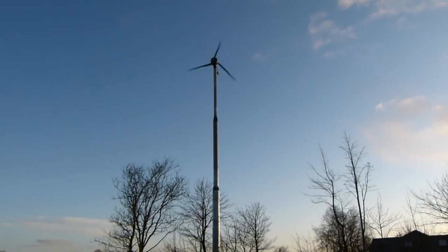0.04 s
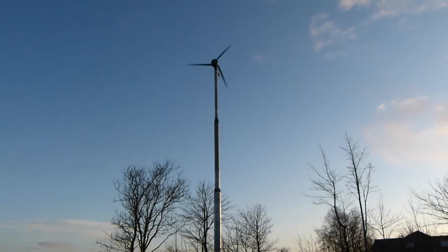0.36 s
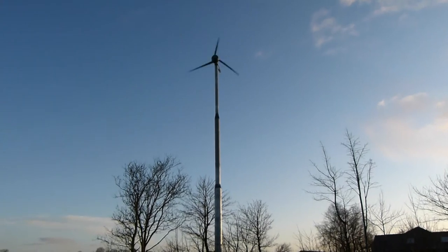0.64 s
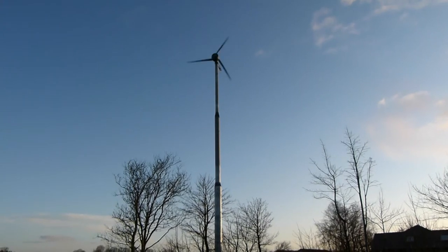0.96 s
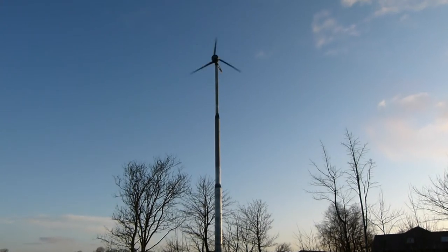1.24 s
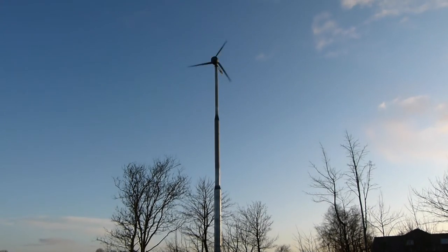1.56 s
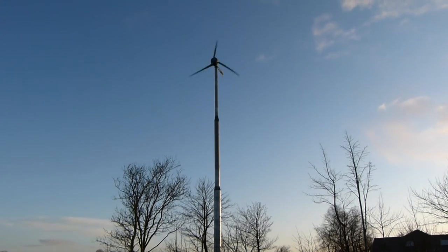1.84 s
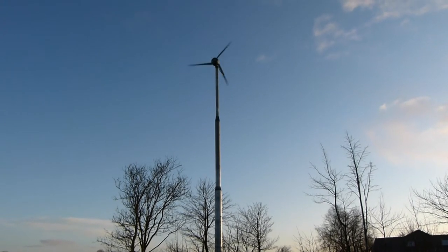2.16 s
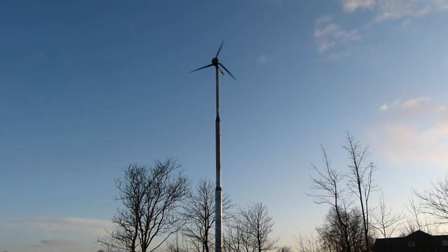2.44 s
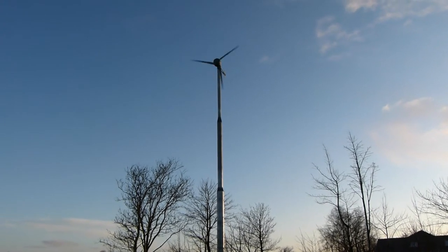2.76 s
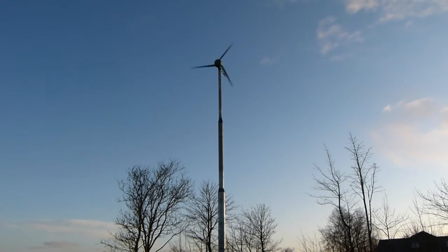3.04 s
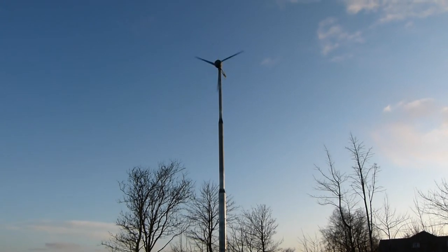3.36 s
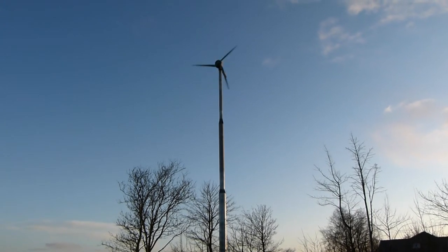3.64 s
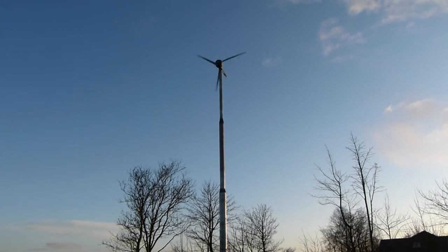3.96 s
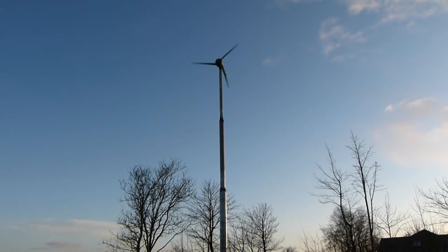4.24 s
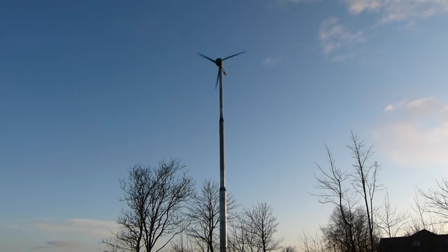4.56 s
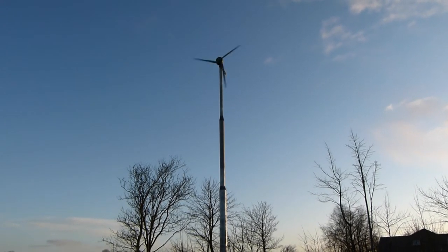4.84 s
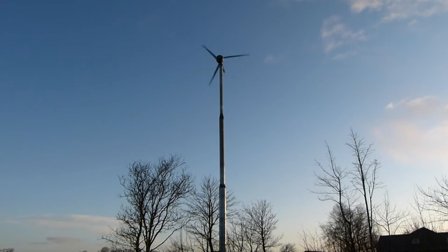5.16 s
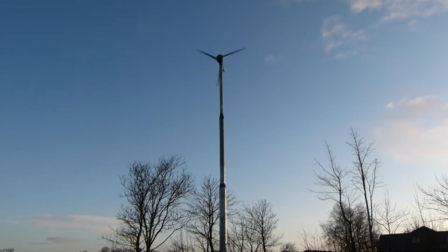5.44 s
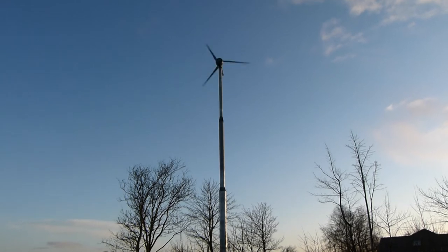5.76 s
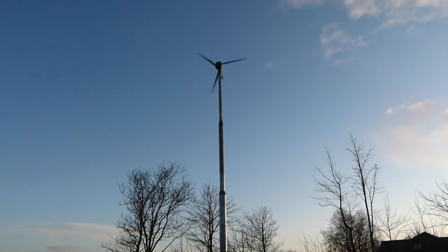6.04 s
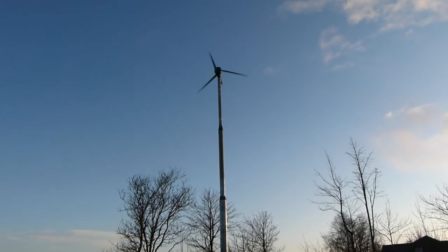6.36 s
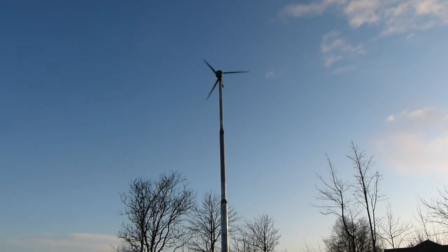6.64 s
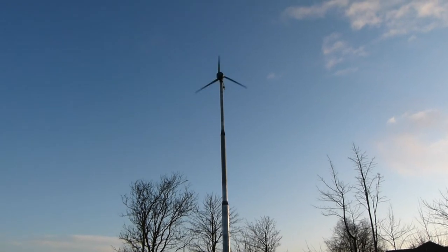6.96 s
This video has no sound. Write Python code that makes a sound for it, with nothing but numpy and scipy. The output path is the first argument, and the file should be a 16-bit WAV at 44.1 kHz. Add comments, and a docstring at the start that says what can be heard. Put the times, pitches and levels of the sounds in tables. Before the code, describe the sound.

A small wind turbine swishes rhythmically in a steady rush of wind, with a low hum and gusts buffeting the microphone.

```python
"""Among bare trees, a small three-bladed wind turbine spins on a mast in a steady rush of wind.
Trailing edges swish; spots on the blades whistle and squeak, Doppler-shifted once a turn.
The generator hums and a hollow drone builds with the wind. Gusts buffet the microphone,
a few things tick and rustle nearby, and one faint, very short, high tick falls in pitch."""
import sys
import numpy as np
from scipy import signal
from scipy.fft import rfft, irfft
from scipy.io import wavfile
from scipy.ndimage import map_coordinates

SR = 44100
rng = np.random.default_rng(int(sys.argv[2]) if len(sys.argv) > 2 else 0)


def waveform_to_disk(signal):
    """Save audio, clipped to [-1, 1], as 16-bit WAV at the path in sys.argv[1]."""
    frames = np.transpose(np.atleast_2d(signal))
    scaled = np.clip(frames, -1, 1) * 32767
    samples = np.round(scaled).astype(np.int16)
    wavfile.write(sys.argv[1], SR, samples)


N = 312669
T = np.arange(N) / SR
HZ = np.maximum(np.arange(N // 2 + 1) * SR / N, 1)

# Blades. Each row: place in turns, relative swish level in dB.
BLADES = [(0.0, 3), (0.333, 3), (0.669, 3)]
# Blade load. Each row: time in seconds, swish gain in dB.
BLADE_LOAD_DB = [(.55, 0), (2.2, -2), (3.2, 0.5), (3.85, -1.5), (4.5, -0.4), (5.85, -1.1), (6.15, 1.1),
                 (6.8, -3), (7.09, -1)]
# A blade cuts a gust. Each row: centre in seconds, boost in dB, length in seconds.
GUST_CUTS = [(.66, 2, 0.077), (.762, 1.5, .06), (0.867, 2, .07), (1.162, -0.5, .06), (1.28, 1.5, .07),
             (1.392, 5.5, 0.067), (1.73, 0, .09), (2.064, 3, .07), (2.325, 3.5, .07), (2.552, 2.5, .07),
             (2.642, 3.5, 0.15), (2.824, 2, .05), (2.946, 4.5, 0.081), (3.143, 3, .08), (3.24, 4.5, .13),
             (3.543, 1, .06), (3.988, 3.5, .05), (4.092, 8, 0.14), (4.312, 4.5, .06), (4.413, 6, 0.13),
             (4.54, 5, .06), (4.655, 6.5, 0.086), (4.775, 6.5, .09), (4.922, 4, .06), (5.012, 3.5, 0.074),
             (5.5, 3, 0.079), (5.587, 4, .13), (6.1, 2.5, .14), (6.178, 5, 0.04), (6.288, 0.5, .07),
             (6.382, 1, .06), (6.488, 6.5, 0.048), (6.598, 3, .07), (6.724, 5.5, .06), (6.836, 1, .06),
             (6.94, 3, .06), (7.05, 6.5, 0.076)]
# Echo off a close surface, changing as the microphone tilts. Each row: time in seconds, lag in seconds.
ECHO_LAG_S = [(5.0, .001163), (6.3, .001143)]
# Strength of that echo. Each row: time in seconds, share of the direct sound.
ECHO_SHARE = [(.55, 0.45), (5.6, 0.36), (6.3, 0.56)]
# The swish turns hollow late on. Each row: time in seconds, share of added resonance.
HOLLOW_SHARE = [(5.6, 0.046), (6.2, 0.64), (7.09, 0.64)]
# Whistling spots, by name. Each row: place in turns, base pitch in Hz, base level in dB,
# rotor position in turns where it beams at the listener.
WHISTLE_SPOTS = {"high": (0.0, 12850, -79, .35), "late": (.19, 11450, -73, .7),
                 "early": (.92, 11100, -74, .14), "low": (.07, 10250, -74, 0)}
# Whistles sharpen in stronger wind. Each row: time in seconds, pitch factor.
WHISTLE_PITCH_FACTOR = [(4.4, 1), (5.3, 1.02)]
# Squeaks. Each row: centre in seconds, level in dB, length in seconds, spot name.
SQUEAKS = [(.768, -59, .04, "late"), (.797, -63, .09, "high"), (.897, -66, .08, "high"),
           (1.078, -77, .08, "late"), (1.15, -71, .07, "high"), (1.265, -71, .14, "high"),
           (1.498, -64, .08, "high"), (1.728, -62, .04, "high"), (1.85, -61, .07, "high"),
           (2.095, -66, .07, "early"), (2.25, -65, .1, "high"), (2.61, -64, .03, "high"),
           (2.63, -62, .035, "low"), (2.702, -65, .05, "early"), (2.972, -66, .1, "high"),
           (3.138, -49, 0.039, "late"), (3.24, -67, .11, "high"), (3.26, -64, .07, "early"),
           (3.446, -67, 0.053, "late"), (3.55, -66, .09, "high"), (3.64, -62, .1, "high"),
           (3.86, -57, 0.092, "early"), (4.024, -60, 0.088, "late"), (4.1, -67, .2, "high"),
           (4.352, -64, .05, "high"), (4.43, -47, 0.032, "low"), (4.718, -54, .05, "low"),
           (5.335, -69, .05, "high"), (6.133, -59, .05, "late"), (6.255, -63, .07, "high"),
           (6.487, -63, .06, "high")]
# Generator shaft. Each row: time in seconds, speed factor.
SHAFT_SPEED_FACTOR = [(.55, .988), (1.6, .987), (2.1, .997), (3.3, 1.003), (4.4, .99), (5.4, 1.01)]
# Hum. Each row: time in seconds, levels of harmonics 1, 2 and 3 in dB.
HUM_LEVELS_DB = [(.55, -66, -55.5, -62), (1.3, -54, -52.5, -64), (2.2, -49.5, -60, -73),
                 (3.1, -56, -57.5, -65), (3.8, -52, -59.5, -64), (4.35, -58, -52, -66),
                 (4.8, -51, -61, -63), (5.7, -56.5, -58, -67), (7.09, -53.5, -57, -68)]

# Level curves. Each row: time in seconds, level in dB.
WIND_DB = [(0.75, -46), (0.87, -45.5), (1.19, -46.5), (1.8, -44), (3.28, -44.5), (3.73, -47), (4.42, -45),
           (4.7, -43), (5.82, -45), (7.05, -42.5)]
ROAR_OVER_RUSH_DB = [(.55, -1.5), (1.4, 2), (2.4, -0.5), (3.3, -0.5), (4.6, -1), (5.6, 2), (7.09, 2.5)]
DRONE_DB = [(3.9, -64), (4.7, -50.5), (5.5, -51), (6.05, -50.5), (6.8, -45.5), (7.09, -47)]
RUMBLE_DB = [(.55, -57), (2.0, -56.5), (2.5, -59), (3.2, -62), (4.4, -51), (5.1, -60), (6.0, -74),
             (7.09, -71)]
# Drone resonances. Each row: centre in Hz, width in Hz, relative level in dB.
DRONE_RESONANCES = [(238, 72, -2), (840, 150, -5)]
# Gusts on the microphone. Each row: centre in seconds, level in dB, length in seconds.
GUSTS = [(.68, -44.5, 0.73), (1.17, -41, 0.19), (1.32, -37, 0.25), (1.556, -39.5, 0.3), (1.713, -37, 0.34),
         (2.335, -54, 0.23), (2.627, -42.5, .16), (2.86, -46.5, 0.17), (3.815, -46.5, 0.12),
         (4.315, -36, 0.1), (4.418, -48.5, .7), (4.76, -39.5, 0.31), (5.392, -47, 0.29)]
# Hardest eddies. Each row: centre in seconds, level in dB, pitch in Hz, length in seconds, pan in dB.
EDDIES = [(0.624, -32, 110, 0.029, 0), (1.143, -29, 85.5, 0.031, 9), (1.187, -33, 150, 0.018, 2),
          (1.267, -29, 129.6, 0.0092, -10), (1.303, -24.5, 150, 0.022, -3), (1.328, -24, 189, 0.016, 2),
          (1.347, -28.5, 330, 0.011, 4), (1.512, -27.5, 149, .03, 0), (1.56, -29.5, 139.7, 0.05, 4),
          (1.598, -31, 195, 0.037, 10), (1.665, -20.5, 125, .022, -5), (1.678, -21, 245, 0.035, 0),
          (1.679, -26, 350, 0.029, 0), (1.768, -21, 115, .026, 0), (1.77, -27.5, 290, .018, -3),
          (2.857, -33, 105, 0.049, -5), (4.319, -28, 118.5, 0.045, 12), (4.731, -30.5, 124.8, .047, 4),
          (4.792, -30.5, 140, .027, 1)]
# Close ticks. Each row: start in seconds, level in dB, pitch in Hz, T60 in seconds, pan in dB.
TICKS = [(4.575, -32, 1060, .015, -6), (4.7549, -26, 1060, .032, 3), (4.9177, -22.5, 9700, 0.003, -7.5)]
# Faint high tick. Each row: centre in seconds, peak in dB, mid pitch in Hz, length in seconds.
HIGH_TICKS = [(5.489, -37.5, 5650, .0045)]
# Rustles. Each row: centre in seconds, level in dB, length in seconds.
RUSTLES = [(1.73, -54, .22), (5.05, -54.5, .35), (5.618, -51, .08)]

# Noise spectra. Each row: frequency in Hz, relative density in dB.
SWISH_SPECTRUM = [(900, -21), (1800, -1), (2100, -6.5), (2600, 8.5), (2900, -3.5), (3400, 5.5), (4400, 0.5),
                  (5200, 1), (5900, 0), (6500, -1.5), (6950, -2.5), (7700, -4), (8600, -4), (10000, -4.5),
                  (11800, -7.5), (12900, -15), (13400, -14), (15200, -24)]
ROAR_SPECTRUM = [(60, -7.5), (110, -8.5), (135, -5.5), (190, -0.5), (240, 1.5), (290, -3), (330, -10.5),
                 (365, -6), (410, -5.5), (500, -19.5), (700, -22)]
RUSH_SPECTRUM = [(250, -20.5), (420, -3), (520, -3.5), (650, 1.5), (830, 1.76), (960, -1), (1120, -8.5),
                 (1380, -2.5), (1620, -3), (1950, -9.5), (2500, -11.5), (4000, -22)]
BUFFET_SPECTRUM = [(22, -26), (33, -11), (48, -3), (80, 6.5), (120, 3.5), (200, -6.5), (300, -15),
                   (600, -28)]
FLUTTER_SPECTRUM = [(120, -13), (215, 6), (280, -9), (390, -6), (520, -23)]
RUSTLE_SPECTRUM = [(2000, -1), (7000, -1), (10500, -2), (13000, -3), (15000, -18)]
RUMBLE_SPECTRUM = [(30, -7), (48, 5.5), (75, 3), (105, -1.5), (160, -25), (300, -27)]
HISS_SPECTRUM = [(150, -26), (300, -10), (700, -4), (920, -0.5), (1050, 6), (1200, 0), (2300, -0.5),
                 (5000, -5), (7800, -10), (9500, -11), (11500, -14), (12500, -11.5), (13500, -18.5),
                 (15200, -29)]


def swish(turns, level_db=-52.5, flutter_db=1.73, hollow_hz=4480, far_extra_s=.000215, far_share=.13):
    """Trailing-edge hiss, louder and choppier under load; two close echoes comb it."""
    load_db, = in_time(BLADE_LOAD_DB)
    lag_s, = in_time(ECHO_LAG_S)
    echo_share, = in_time(ECHO_SHARE)
    hollow_share, = in_time(HOLLOW_SHARE)
    gust_db = sum(db * bump(s, length_s) for s, db, length_s in GUST_CUTS)
    beat_db = (1.2 + 0.14 * load_db) * blade_pulse(turns)
    direct = air_noise(SWISH_SPECTRUM, correlation=1)
    ring = signal.lfilter(*signal.iirpeak(hollow_hz, Q=29, fs=SR), direct)
    direct = direct + hollow_share * ring
    echoes = echo_share * delayed(direct, lag_s) + far_share * delayed(direct, lag_s + far_extra_s)
    edge_noise = rms_one(direct + echoes) * panned(pan_db=-1.2)
    return edge_noise * from_db(level_db + load_db + gust_db + beat_db + flutter_db * drift(68))


def blade_pulse(turns, sharpness=1.6):
    """Power swells as each blade approaches; zero mean, rms 1."""
    power = sum(from_db(db) ** 2 * np.exp(sharpness * (np.cos(2 * np.pi * (turns - place)) - 1))
                for place, db in BLADES)
    return rms_one(power - power.mean())


def whistles(turns, fade_db_per_s=.9, beaming_db=2.5, fitful_db=5.5, sputter_db=2.5):
    """Fitful, fading edge tones, louder when beamed at the listener, breaking into squeaks."""
    out = 0
    for spot, (place, hz, level_db, beam_turns) in WHISTLE_SPOTS.items():
        aim_db = beaming_db * np.cos(2 * np.pi * (turns - beam_turns))
        simmer = from_db(level_db + fitful_db * drift(35) + aim_db - fade_db_per_s * T)
        squeaks = swells((s, db, length_s) for s, db, length_s, name in SQUEAKS if name == spot)
        sputter = from_db(sputter_db * drift(120))
        out += (simmer + squeaks * sputter) * edge_tone(turns, place, hz)
    return out


def edge_tone(turns, place, hz, width_hz=130, mach=.112):
    """Narrow noise band, Doppler-shifted up and down once a turn; rms 1."""
    approach = np.cos(2 * np.pi * (turns - place))
    pitch_factor, = in_time(WHISTLE_PITCH_FACTOR)
    phase = 2 * np.pi * np.cumsum(hz * pitch_factor * (1 + mach * approach)) / SR
    pole = np.exp(-2 * np.pi * width_hz / SR)
    in_phase, quadrature = signal.lfilter([1], [1, -2 * pole, pole * pole], rng.standard_normal((2, N)))
    return rms_one(in_phase * np.cos(phase) + quadrature * np.sin(phase))


def generator(nominal_hz=161.3, waver=0.0019, flicker_db=1.3):
    """Three hum harmonics trade strength; their pitch follows the shaft speed."""
    speed, = in_time(SHAFT_SPEED_FACTOR)
    phase = 2 * np.pi * nominal_hz * np.cumsum(speed + waver * drift(9.6)) / SR
    return sum(np.sqrt(2) * from_db(db + flicker_db * drift(11)) * np.sin(k * phase)
               for k, db in enumerate(in_time(HUM_LEVELS_DB), 1))


def wind(flutter_db=0.85):
    """Low roar and broad rush, both following the wind speed."""
    wind_db, = in_time(WIND_DB)
    roar_db, = in_time(ROAR_OVER_RUSH_DB)
    roar = air_noise(ROAR_SPECTRUM, correlation=1) * from_db(wind_db + roar_db)
    rush = air_noise(RUSH_SPECTRUM, correlation=1) * from_db(wind_db + flutter_db * drift(24))
    return roar + rush * panned(pan_db=-1.25)


def buffeting(lumpy_db=1.0, ragged=0.22, port_phase_rad=0.79, flutter_db=-4, port_low_hz=45):
    """Gusts hit the microphone ports, the strongest fluttering; an eddy is a few pressure swings."""
    strength = swells(GUSTS)
    flutter = air_noise(FLUTTER_SPECTRUM, correlation=0.4) * from_db(flutter_db)
    buffet = air_noise(BUFFET_SPECTRUM, correlation=0.05)
    pressure = (buffet + flutter * strength / strength.max()) * strength * from_db(lumpy_db * drift(32))
    eddy_time_s = np.cumsum(1 + ragged * drift(74.1)) / SR
    for s, db, hz, length_s, pan_db in EDDIES:
        phase = 2 * np.pi * (hz * eddy_time_s + rng.random()) + port_phase_rad * np.array([[1], [-1]])
        pressure += from_db(db) * bump(s, length_s) * np.sin(phase) * panned(pan_db)
    return signal.sosfilt(signal.butter(2, port_low_hz, "high", fs=SR, output="sos"), pressure)


def drone():
    """Air noise in two broad resonances, swelling as the wind rises."""
    level_db, = in_time(DRONE_DB)
    white = rfft(rng.standard_normal(N))
    out = 0
    for hz, width_hz, db in DRONE_RESONANCES:
        band = irfft(white / (1 + ((HZ - hz) / width_hz) ** 2) ** 2, N)
        out += from_db(db) * rms_one(band)
    return from_db(level_db) * out


def ticks():
    """Each tick: one fast-dying resonance with grit around its pitch."""
    out = np.zeros((2, N))
    for s, db, hz, t60_s, pan_db in TICKS:
        age_s = np.clip(T - s, 0, 2 * t60_s)
        band = signal.butter(1, [hz / 1.4, hz * 1.4], "band", fs=SR, output="sos")
        grit = .5 * signal.sosfilt(band, rng.standard_normal((2, N)))
        lead_s = 3e-6 * pan_db * np.array([[1], [-1]])   # nearer microphone leads
        ring = np.sin(2 * np.pi * hz * (age_s + lead_s))
        decay = (T > s) * from_db(db - 60 * age_s / t60_s)
        out += decay * (ring + grit) * panned(pan_db)
    return out


def high_tick(fall_hz_per_s=150000):
    """One faint, very short, high tick that falls in pitch."""
    out = 0
    for s, db, hz, length_s in HIGH_TICKS:
        phase = 2 * np.pi * (T - s) * (hz - .5 * fall_hz_per_s * (T - s))
        out += from_db(db) * bump(s, length_s) * np.sin(phase)
    return out


def rustles():
    """Brief soft hiss, different at each microphone port."""
    return air_noise(RUSTLE_SPECTRUM, correlation=0) * swells(RUSTLES)


def rumble(lumpy_db=3.0):
    """Light air brushes the microphone ports throughout."""
    level_db, = in_time(RUMBLE_DB)
    return air_noise(RUMBLE_SPECTRUM, correlation=0.2) * from_db(level_db + lumpy_db * drift(8.9))


def hiss(level_db=-51.0):
    """Even noise bed; the microphone's housing rings near 1050 Hz."""
    return from_db(level_db) * air_noise(HISS_SPECTRUM, correlation=0)


def air_noise(spectrum, correlation):
    """Stereo noise of given spectrum and left-right correlation; rms 1."""
    mid, side = rfft(rng.standard_normal((2, N)))
    pair = np.sqrt(1 + correlation) * mid + np.sqrt(1 - correlation) * side * [[1], [-1]]
    hz, db = np.transpose(spectrum)
    shape = from_db(np.interp(np.log(HZ), np.log(hz), db))
    skirts = np.minimum(1, np.minimum(HZ / hz[0], hz[-1] / HZ)) ** 2
    return rms_one(irfft(pair * shape * skirts, N))


def drift(rate_hz):
    """Low-passed random wander; rms 1."""
    return rms_one(irfft(rfft(rng.standard_normal(N)) / (1 + (HZ / rate_hz) ** 2) ** 2, N))


def bump(centre_s, length_s):
    """Smooth swell of height 1."""
    return np.cos(np.pi * np.clip((T - centre_s) / length_s, -.5, .5)) ** 2


def swells(rows):
    """Gain curve of summed bumps."""
    return sum(from_db(db) * bump(s, length_s) for s, db, length_s in rows)


def in_time(rows):
    """Each value column of a curve at every sample."""
    s, *columns = np.transpose(rows)
    return [np.interp(T, s, column) for column in columns]


def delayed(x, lag_s):
    """Both channels, later by a varying lag."""
    return np.array([map_coordinates(side, [(T - lag_s) * SR], order=3) for side in x])


def panned(pan_db):
    """Left and right gains; positive is left."""
    return from_db(np.array([[.5], [-.5]]) * pan_db)


def from_db(db):
    """Decibels to gain."""
    return 10 ** (np.asarray(db) / 20)


def rms_one(x):
    """Scale to unit power."""
    return x / np.sqrt(np.mean(x ** 2) + 1e-20)


def scene(turns_per_s=3.372, first_blade_approach_s=.568):
    """Turbine, wind and small sounds in open air."""
    turns = turns_per_s * (T - first_blade_approach_s)
    turbine = swish(turns) + whistles(turns) + generator()
    air = drone() + wind() + hiss() + rumble() + buffeting()
    return turbine + air + ticks() + high_tick() + rustles()


def record(dry, start_s=.551, fade_in_s=.003, stopband_hz=16200):
    """The microphone opens after a short silence; the top is cut."""
    opened = np.clip((T - start_s) / fade_in_s, 0, 1)
    lowpass = signal.cheby2(16, 60, stopband_hz, fs=SR, output="sos")
    return signal.sosfilt(lowpass, dry * opened + 1e-18)


dry = scene()
out = record(dry)
waveform_to_disk(out)
```